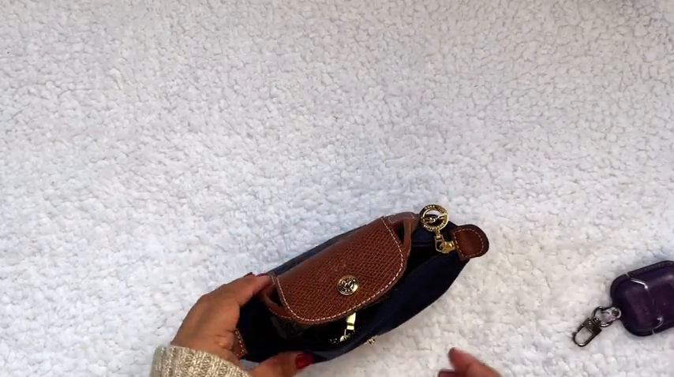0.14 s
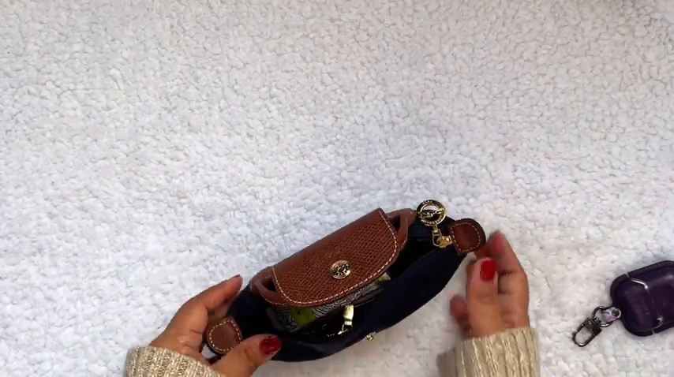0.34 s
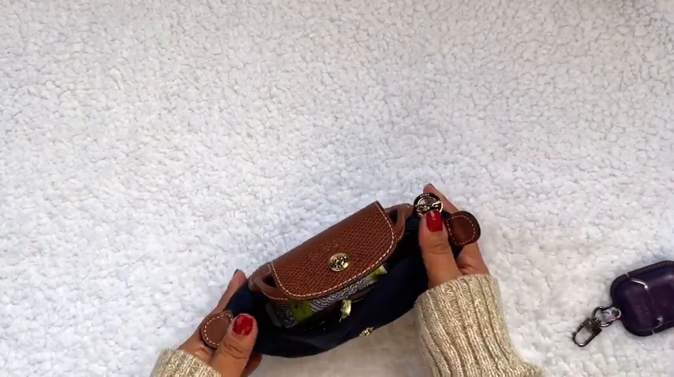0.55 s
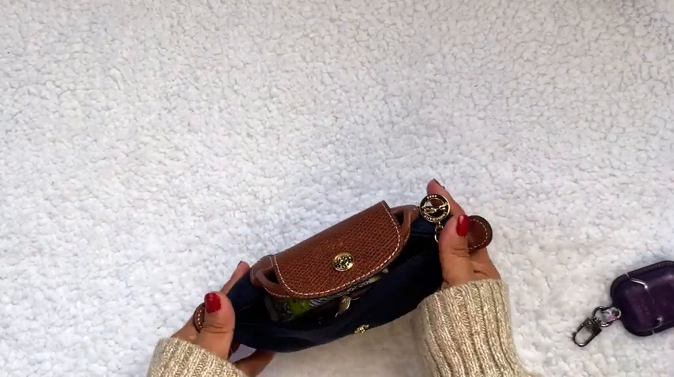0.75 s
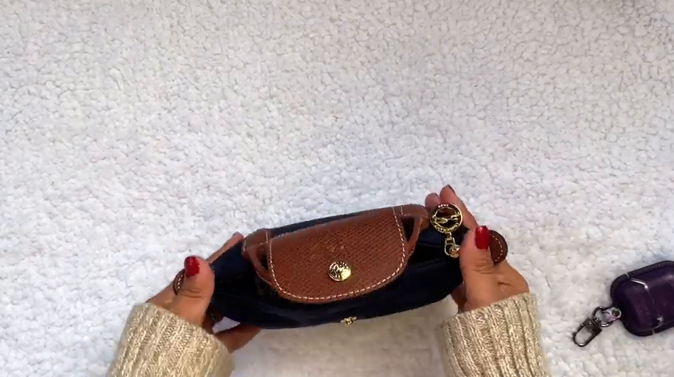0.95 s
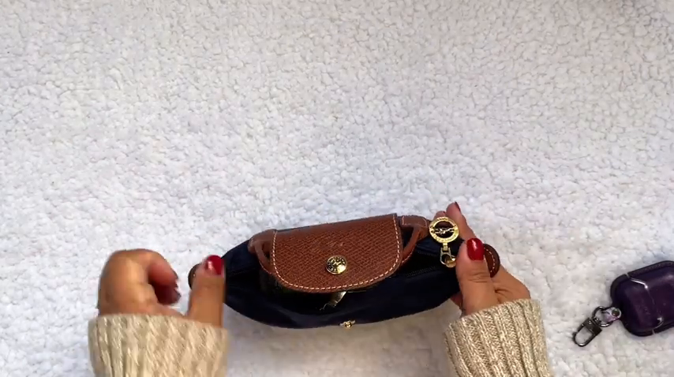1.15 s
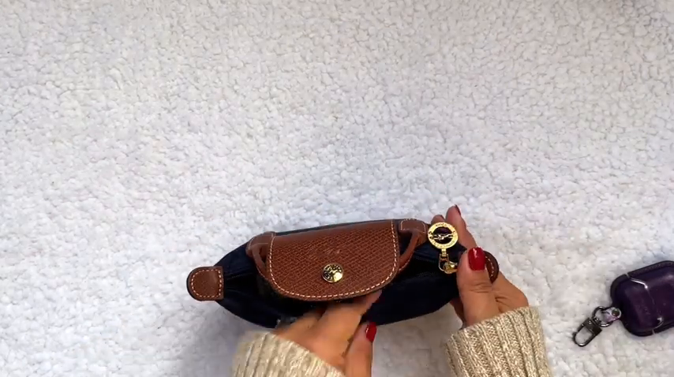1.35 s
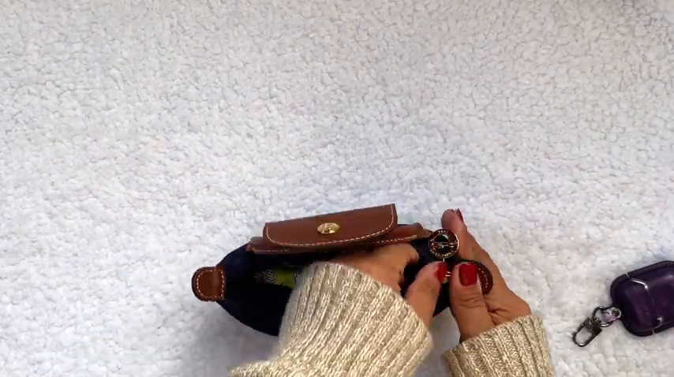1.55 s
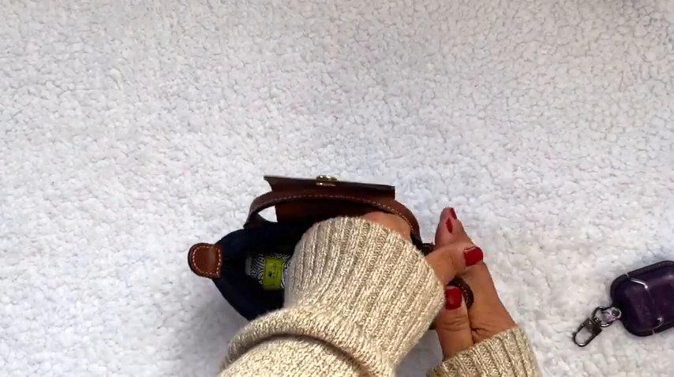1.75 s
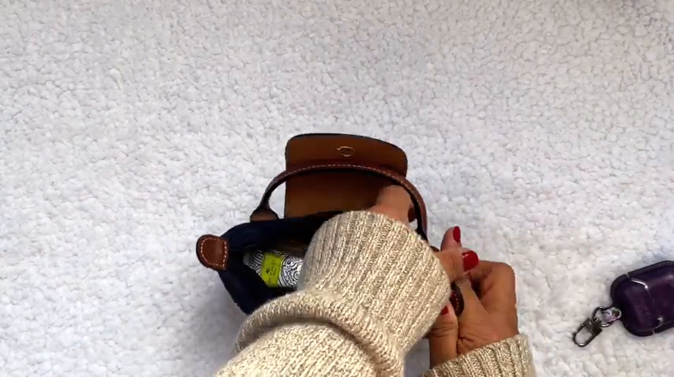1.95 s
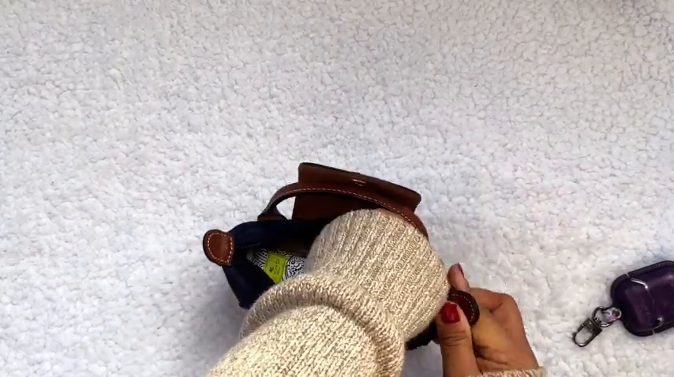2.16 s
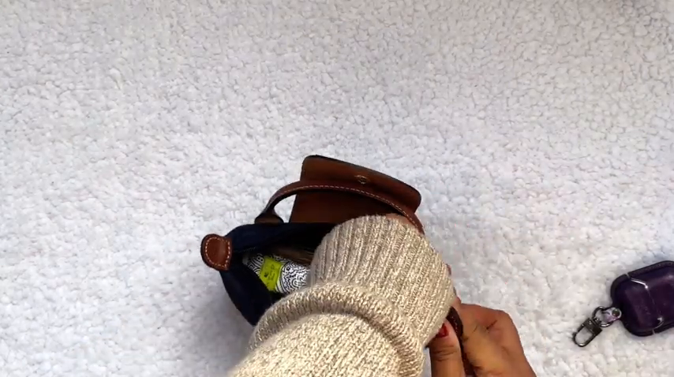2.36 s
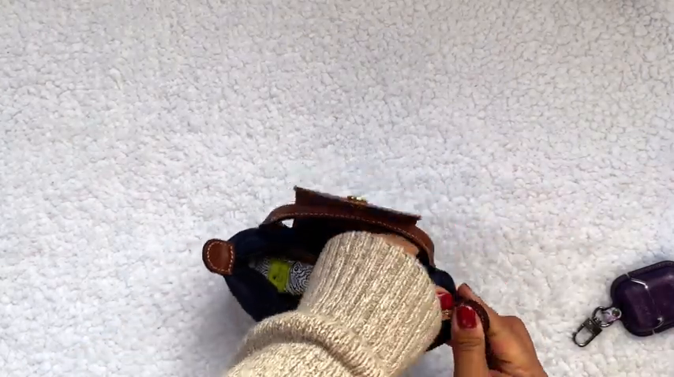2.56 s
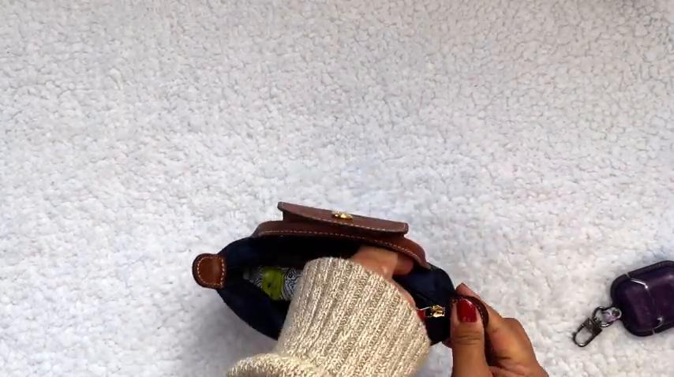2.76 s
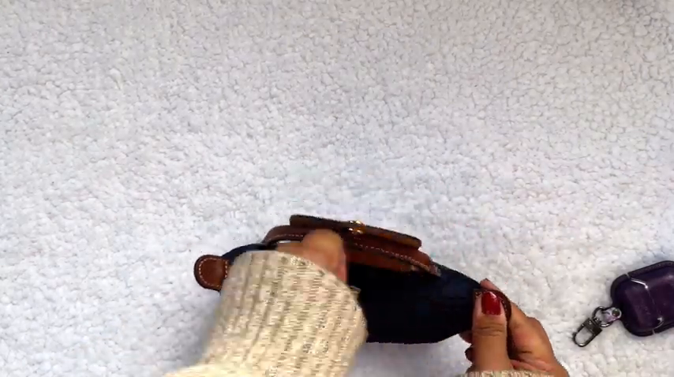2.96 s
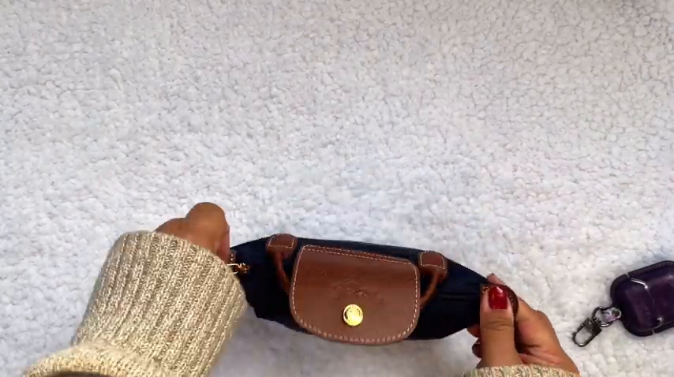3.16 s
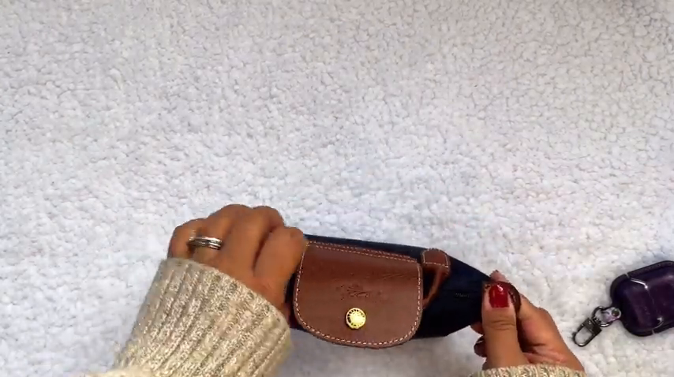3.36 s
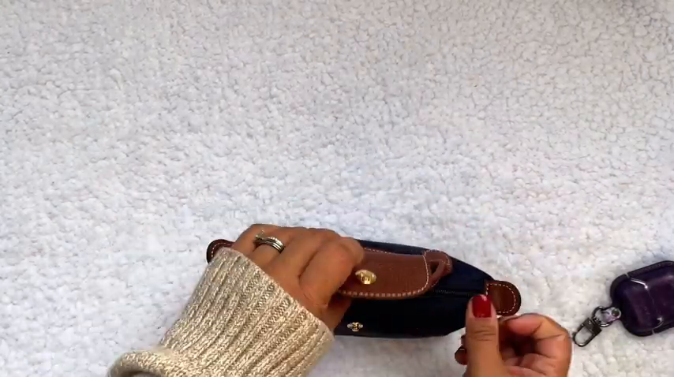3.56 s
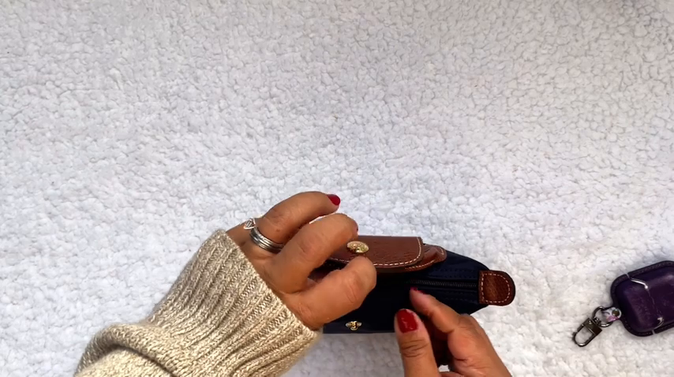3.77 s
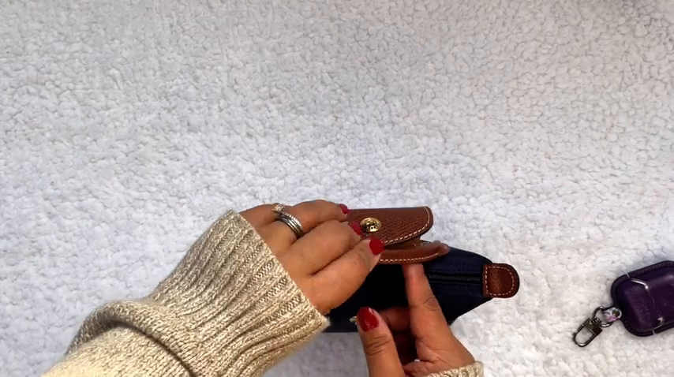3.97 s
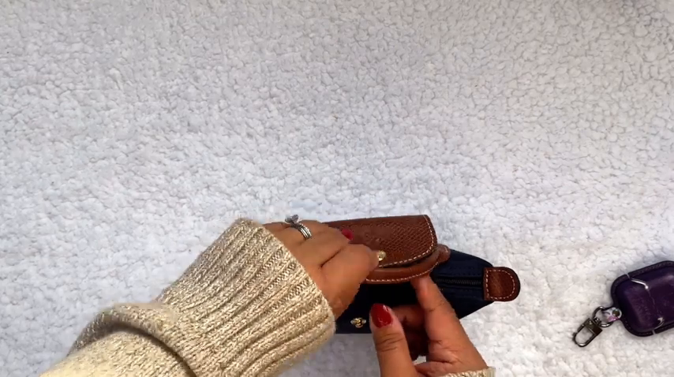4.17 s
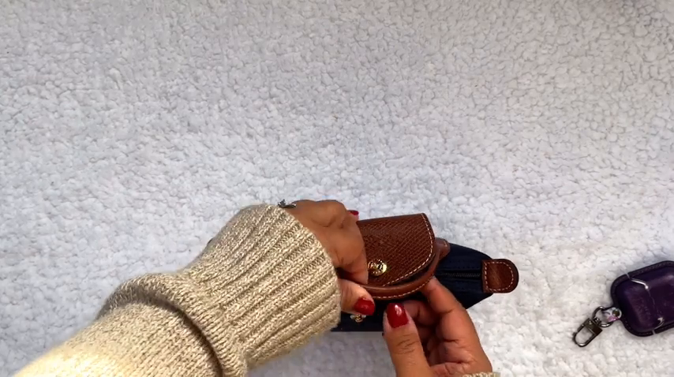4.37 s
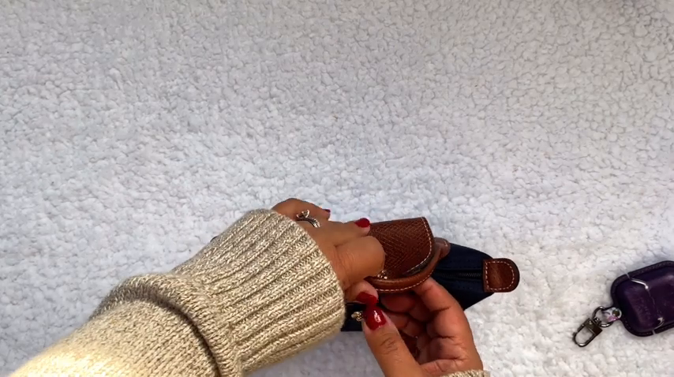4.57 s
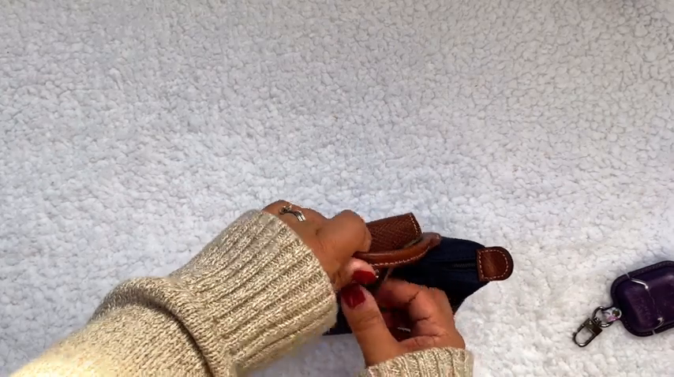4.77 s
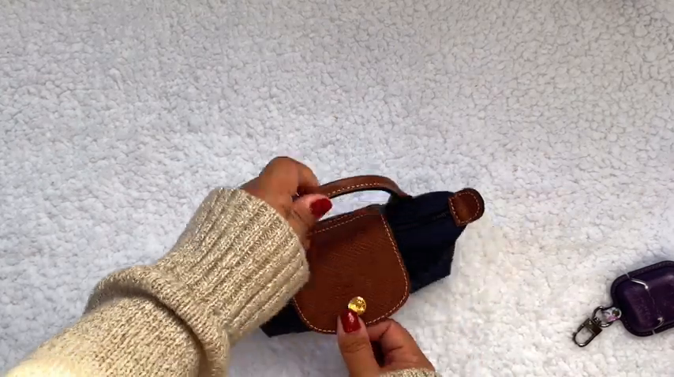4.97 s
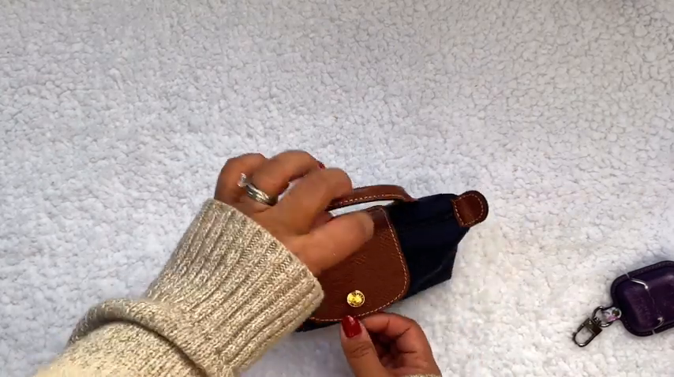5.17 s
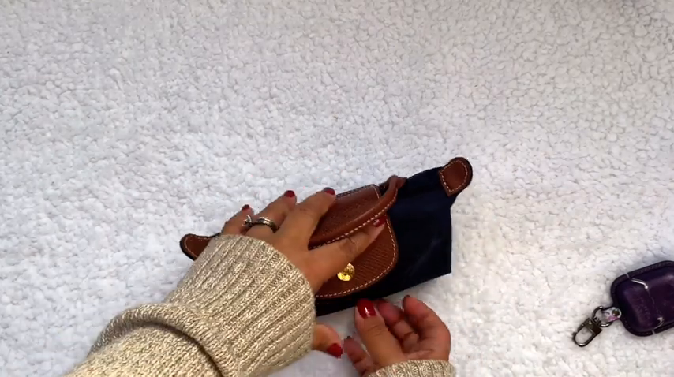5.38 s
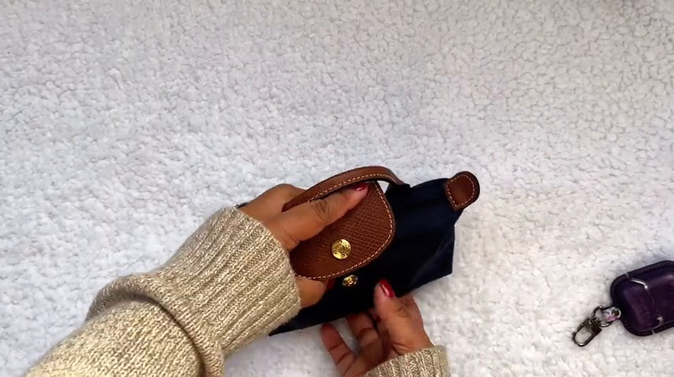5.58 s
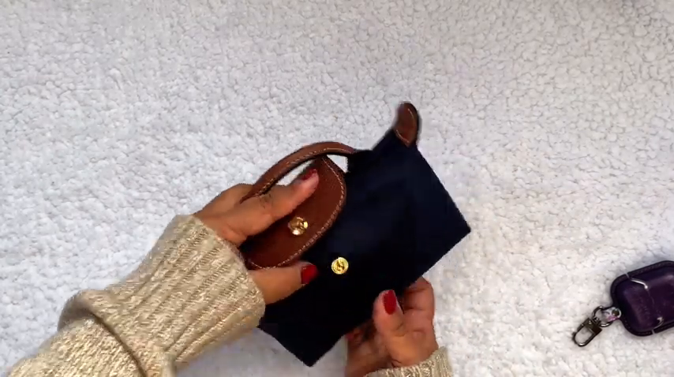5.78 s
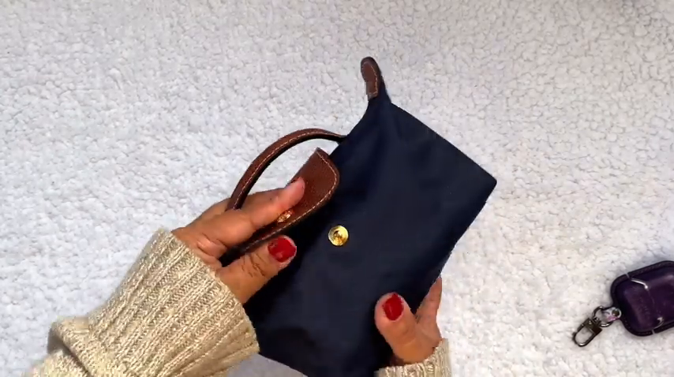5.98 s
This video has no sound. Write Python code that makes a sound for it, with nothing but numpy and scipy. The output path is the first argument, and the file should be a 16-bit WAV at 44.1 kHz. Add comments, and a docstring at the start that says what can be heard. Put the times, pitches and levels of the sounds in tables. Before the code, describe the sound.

Close up in a quiet room, hands rub and crumple a small nylon pouch, with dry scuffs, light ticks and soft knocks. Near the middle a coil zipper closes in one very short stroke, its rasping hum climbing quickly in pitch before stopping. A metal tab clinks lightly, then uneven rustling and clicking continue, growing denser towards the end. Faint room noise lies beneath.

```python
"""First hands rub and crumple a small nylon pouch: uneven noise with crackling cloth and short scuffs.
Nails, pull tab and contents tick and knock as short rings, and the tab clinks. Near 2.8 s a coil zipper
is pulled shut in one quick stroke close under a phone: its teeth, in fast succession, hum and rasp.
Then the hands go on rubbing and ticking to the end. Soft noise of a quiet room lies under it all.
Around 9 to 13 kHz left and right carry nearly opposite signals, so their sum is weak there."""
import sys
import numpy as np
from scipy import signal
from scipy.fft import rfft, irfft, next_fast_len
from scipy.io import wavfile
from scipy.ndimage import uniform_filter1d, map_coordinates

SR = 44100
rng = np.random.default_rng(int(sys.argv[2]) if len(sys.argv) > 2 else 0)


def file_out(sig):
    """Save sig as 16-bit WAV at sys.argv[1]."""
    # one column per channel
    cols = np.atleast_2d(sig).T
    # limit, then scale
    lim = np.clip(cols, -1, 1)
    pcm = np.round(lim * 32767).astype(np.int16)
    wavfile.write(sys.argv[1], SR, pcm)


N = 266259  # length in samples

# Resonances of the stuffed pouch. Each row: pitch in Hz, width in Hz, level in dB
# (the level counts twice where the response is squared).
POUCH_MODES = [(142, 80, -4.5), (280.7, 98.4, 1.5), (423, 148, 1.5), (688, 250, -9.5)]
# Treble colour of rubbed cloth and rasping teeth. Each row: frequency in Hz, relative level in dB.
FIZZ_COLOUR = [(1800, -49), (2800, 3.5), (4300, 4.5), (6000, 0), (8000, 0.5), (11000, -10.5), (14500, -13),
               (16500, -26.5)]


def amp(db):
    """Turn dB into gain."""
    return 10 ** (np.asarray(db) / 20)


def unit(x):
    """Scale x to an rms of 1."""
    return x / np.sqrt(np.mean(x ** 2) + 1e-20)


def along(points, hz):
    """Read a curve of (Hz, value) points at hz, on a log frequency axis."""
    f, v = np.transpose(points)
    return np.interp(np.log(hz + 1), np.log(f + 1), v)


def curves(rows):
    """Give one value per sample for each column after the time column."""
    seconds, *columns = np.transpose(rows)
    return [np.interp(np.arange(N) / SR, seconds, column) for column in columns]


def wobble(rate):
    """Draw a smooth random curve with this many random points a second."""
    knots = rng.standard_normal(int(N * rate / SR) + 4)
    return map_coordinates(knots, [np.arange(N) * rate / SR])


def filtered(x, response):
    """Multiply the spectrum of x by a response, a function of frequency."""
    m = next_fast_len(x.shape[-1] + SR // 4)
    spectrum = rfft(x, m) * response(np.fft.rfftfreq(m, 1 / SR))
    return irfft(spectrum, m)[..., :x.shape[-1]]


def modes(table):
    """Make the response of a few resonances that ring only after they are struck."""
    def response(f):
        return sum((-1) ** k * amp(db) * 1j * f * w / (c * c - f * f + 1j * f * w)
                   for k, (c, w, db) in enumerate(table))
    return response


def shape(points):
    """Make a response from (Hz, dB) points."""
    return lambda hz: amp(along(points, hz))


def fibres(response, unevenness, patchy_db):
    """Make two noises of joint rms 1 that follow an unevenness curve, in patches of random gain."""
    z = signal.stft(unevenness * rng.standard_normal((2, N)), nperseg=256)[2]
    field = rng.standard_normal(z.shape[1:])
    field = uniform_filter1d(uniform_filter1d(field, 4, 0), 8, 1)  # smooth over frequency, then time
    noise = signal.istft(z * amp(patchy_db * unit(field)), nperseg=256)[1]
    return unit(filtered(noise[:, :N], response))


def zipper():
    """Each tooth that the slider closes is one jolt: a hum at the tooth rate and a burst of rasp."""
    # The slider stroke. Each row: time in seconds, teeth per second, level of the hum in dB,
    # ring of the open tape in Hz, level of that ring in dB (counts twice), level of the rasp in dB.
    stroke = [(2.765, 65.5, -66, 1010, 2, -48.5), (2.81, 71.4, -64, 1000, 0, -56.5),
              (2.83, 118, -53, 990, -11.5, -44), (2.855, 178, -55.5, 1000, 3.5, -43.5),
              (2.868, 266, -50.5, 1000, 8, -40), (2.88, 300, -45, 1020, 5, -38),
              (2.9, 327, -43, 1003, 4, -37.5), (2.935, 345, -33, 1050, -4, -38.5),
              (2.96, 370, -34.5, 1095, 3, -40.5), (2.967, 415, -38, 1084, -4, -34),
              (2.976, 487, -30.5, 1000, 2.5, -35), (2.99, 530, -40, 1050, 4, -38.5),
              (3.003, 562, -35.5, 1110, 1, -34), (3.012, 650, -35.5, 1890, 0, -38.5),
              (3.027, 685, -23, 2110, 1, -35), (3.042, 775, -24.5, 2380, -2.5, -32),
              (3.047, 802, -33, 1600, 5.5, -32), (3.062, 880, -30, 1700, 3, -35),
              (3.066, 730, -22.5, 1480, -5, -35), (3.073, 680, -26.5, 1375, 4.5, -34),
              (3.082, 557, -30, 1240, 2, -31.5), (3.09, 477, -38, 1030, -1.5, -44),
              (3.1, 200, -59.5, 900, -11, -48.5), (3.125, 120, -63.5, 900, -13, -47),
              (3.14, 50, -70, 900, -11, -62.5)]
    # What the hum rings in. Each row: pitch in Hz, width in Hz, level in dB (counts twice).
    hum_modes = [(138, 150, 5.5), (354, 140, 3.5), (522, 95, 2.5), (838, 137, 2.5), (2450, 1100, -5),
                 (4000, 900, -3.5)]
    # Resonances of slider and tape. Each row: pitch in Hz, width in Hz, level in dB.
    slider = [(694, 150, -11), (1088, 110, -2), (2010, 580, -6.5), (3120, 77, -7)]
    flutter_db = 2.2  # unsteadiness of each overtone
    ring_width = .25  # ring of the tape, as a share of its pitch
    rasp_bright_db, rasp_body_db = -7, -11  # treble and pouch shudder, against the main rasp

    rate, pull_db, ring_hz, ring_db, rasp_db = curves(stroke)
    t = np.arange(N) / SR
    moving = 1. * ((t > stroke[0][0]) & (t < stroke[-1][0]))
    moving = uniform_filter1d(moving, 200)  # soft start and stop
    teeth = np.cumsum(rate * (1 + .014 * wobble(110))) / SR  # teeth closed so far

    # an overtone is loud while it passes a resonance of pouch, slider or tape
    tape = (ring_hz, ring_width * ring_hz, ring_db)
    rings = [(c, w, amp(db) ** 2) for c, w, db in hum_modes + [tape]]

    def gain(hz):
        return np.sqrt(sum((g / (1 + ((c * c - hz * hz) / (hz * w)) ** 2)) ** 2 for c, w, g in rings))

    # teeth lock a little early or late, which blurs the upper overtones most
    slip = teeth + 0.03 * wobble(300)
    hum = 0
    for k in range(1, 11):
        level = amp(pull_db + flutter_db * wobble(110))
        hum = hum + level * gain(k * rate) * np.exp(2j * np.pi * k * slip)

    # the rasp flares as a tooth locks and fades until the next; teeth differ in strength
    strength = amp(0.57 * rng.standard_normal(int(teeth[-1]) + 2))[teeth.astype(int)]
    flare = unit(0.2 + strength * np.exp(-3.5 * (teeth % 1)))
    flare = flare * rng.standard_normal((2, N))
    rasp = unit(filtered(flare, modes(slider)))
    rasp += amp(rasp_bright_db) * unit(filtered(flare, shape(FIZZ_COLOUR)))
    rasp += amp(rasp_body_db) * unit(filtered(flare, modes(POUCH_MODES)))
    hum_pair = [hum.imag, .6 * hum.real - 0.18 * hum.imag]
    return moving * [[1], [.6]] * (amp(rasp_db) * rasp + hum_pair)


def contacts():
    """A short ring that sags in pitch, with a bright edge; the same blow knocks the stuffed pouch."""
    # Each row: start in seconds, peak of the tick in dB, pitch in Hz, knock in dB over the tick,
    # bright edge in dB over the ring (lowered by 1 dB below), seconds for the ring to fade by 60 dB.
    ticks = [(0.018, -33.5, 835, -5, -16, 0.021), (0.0299, -49, 2240, 12, -15, 0.059),
             (0.08, -55, 1210, 12.5, -16, 0.022), (0.743, -49.5, 1180, 11.5, -6, 0.022),
             (0.798, -40, 3590, -15, -9, 0.03), (0.846, -50.5, 1180, -7, -15, 0.013),
             (0.984, -39, 2090, -23, -31, 0.027), (1.077, -42, 740, 4.5, -17, 0.062),
             (1.324, -34.5, 990, -13, 9.5, 0.022), (1.349, -34.5, 1070, -7, 7, 0.055),
             (1.38, -39, 1470, -10, 6, 0.011), (1.397, -39, 1340, -12, 2, 0.015),
             (1.407, -45, 1390, -5, -9, 0.01), (1.603, -38.5, 1270, -7, -12, 0.011),
             (1.647, -40, 1056, -2, -15.5, 0.01), (1.954, -35.5, 1290, -1, 18, 0.0074),
             (2.062, -32, 1115, -3, 9, 0.025), (2.099, -57, 2130, -14, -3.5, 0.0091),
             (2.135, -48, 1700, -21, -10, 0.012), (2.163, -33.5, 2470, -11, -9, 0.0084),
             (2.172, -24.5, 1120, -6, 8.5, 0.0024), (2.245, -37, 1500, -4, -2, 0.0078),
             (2.265, -31.5, 1850, -12, 6.5, 0.012), (2.348, -41, 1040, -14, 0.5, 0.042),
             (2.358, -32, 1590, -20, 4, 0.035), (2.593, -45.5, 3900, -25, -6, 0.014),
             (2.626, -46, 2010, -26.5, 13, 0.018), (2.666, -47.5, 2040, -11, 12, 0.021),
             (2.7659, -34, 3940, -11, 7.5, 0.024), (2.781, -32, 4150, -11, 12, 0.11),
             (2.797, -43, 1890, -26, 2, 0.02), (2.815, -39.5, 1106, -12, 2.5, 0.025),
             (2.9645, -28, 3960, -28, -10.5, 0.012), (2.9698, -17, 4220, -25, -4.5, 0.011),
             (2.9734, -27.5, 1466, -30, -1.5, 0.016), (3.083, -27, 4470, 2, -6.5, 0.01),
             (3.101, -31.5, 2930, -13, -6, 0.013), (3.112, -29, 3130, -3.5, -0.5, 0.02),
             (3.143, -35, 1186, -22, -26, 0.018), (3.175, -33, 717, -11, -26.5, 0.014),
             (3.275, -38, 930, -22, -10.5, 0.018), (3.299, -43.5, 1020, 6, -2.5, 0.011),
             (3.323, -34, 1040, -4, -13.5, 0.015), (3.338, -34.5, 1020, -3, -7, 0.015),
             (3.476, -49, 1080, 8, -21, 0.033), (3.65, -36.5, 807, -2, 8, 0.047),
             (3.694, -44.5, 1380, -3, -15, 0.025), (4.03, -40, 1800, 4.5, 2, 0.012),
             (4.081, -40.5, 1900, -3.5, -12, 0.015), (4.283, -26, 4060, -11.5, -18, 0.03),
             (4.334, -30.5, 1870, -3, -29, 0.0096), (4.619, -41, 1600, -7, -11, 0.022),
             (4.654, -29.5, 1960, -14, -25, 0.021), (4.674, -34, 2135, -31, -13.5, 0.052),
             (4.6847, -34.5, 1865, -35, -10, 0.05), (4.8373, -35.5, 2020, -28, -3, 0.017),
             (4.8521, -26, 1830, -28, -15, 0.021), (4.8619, -27.5, 1930, -20, -3.5, 0.05),
             (4.866, -24.5, 1574, -6, -5.5, 0.011), (4.897, -33.5, 1900, -3, -1, 0.0078),
             (4.92, -33.5, 1280, 2.5, -9, 0.012), (4.965, -40, 2260, -12, -8, 0.012),
             (4.972, -30, 1050, 1, -7.5, 0.0095), (4.9796, -29, 1890, -1, 5, 0.011),
             (4.9913, -31.5, 2750, -8, 8.5, 0.018), (5.016, -34, 2790, -17, 5, 0.02),
             (5.074, -42, 900, -8, 1, 0.015), (5.159, -37, 3660, -30, -6.5, 0.0096),
             (5.196, -47.5, 2210, -7, -20, 0.019), (5.232, -50, 2330, 4, -19, 0.0176),
             (5.282, -34, 2730, 1, 9, 0.0083), (5.3026, -21.5, 3430, -6.5, -8, 0.0068),
             (5.3066, -31, 3130, -1.5, -22, 0.016), (5.3177, -42, 3310, -14, -7, 0.012),
             (5.336, -41, 1230, 6, -2, 0.01), (5.342, -26, 4220, -11, 3, 0.008),
             (5.369, -40.5, 1140, -8, -12, 0.0076), (5.382, -41, 3600, -14, -7, 0.01),
             (5.3943, -45, 2320, -15, -4, 0.0087), (5.422, -38.5, 3140, 0.5, 1, 0.011),
             (5.442, -34, 1690, 2, 2.5, 0.0065), (5.4541, -23.5, 3370, -17, 0, 0.0064),
             (5.483, -41.5, 1190, -15, -15, 0.0059), (5.49, -39.5, 3700, -19, -14, 0.0092),
             (5.548, -36.5, 1980, -21, -11, 0.02), (5.554, -32, 1820, -2, -22, 0.017),
             (5.5639, -32.5, 3650, -8, -21, 0.021), (5.568, -33, 1130, -6, -18, 0.0057),
             (5.665, -47, 1214, 16.5, -9, 0.024), (5.789, -31.5, 1050, -17, 15, 0.021),
             (5.81, -44.5, 900, 7, -9, 0.0081), (5.8678, -30, 950, -26, -22.5, 0.015),
             (5.8712, -25.5, 1380, -16, -9, 0.013), (5.93, -35.5, 840, -12, -3.5, 0.011),
             (5.9489, -32.5, 1040, -2, -5, 0.014), (5.963, -44, 900, -4, -15, 0.0063),
             (5.975, -43.5, 705, 10.5, -16, 0.015), (5.985, -29, 1754, -32, -17, 0.056)]
    # Colour of the bright edge. Each row: frequency in Hz, relative level in dB.
    crack = [(700, -30), (1800, -6), (4300, 5.5), (8000, -2.5), (11000, -2), (16500, -21)]
    grit = .7  # noise in the ring, against the pure tone
    sag = 0.19  # the pitch starts about 13 % sharp
    rise_cycles = 0.62  # time constant of the ring's rise

    t = np.arange(SR // 16) / SR
    f = np.fft.rfftfreq(len(t), 1 / SR)
    out, blows = np.zeros((2, N + len(t))), np.zeros(N)
    crack_gain = shape(crack)(f)
    for s, db, hz, knock_db, bright_db, t60 in ticks:
        start = round(s * SR)
        fade = amp(-60 * t / t60) * (1 - np.exp(-t * hz / rise_cycles)) ** 2
        noise = rfft(rng.standard_normal((2, 2, len(t))))
        cycles = hz * (t - sag * 0.0012 * np.exp(-t / 0.0017)) + rng.random((2, 1))
        gritty = unit(irfft(noise[0] * modes([(hz, .7 * hz, 0)])(f) ** 2, len(t)))
        tone = np.sin(2 * np.pi * cycles) + grit * gritty
        edge_fade = amp(-110 * t / t60) * (1 - np.exp(-t / 0.0006))
        edge = edge_fade * unit(irfft(noise[1] * crack_gain, len(t)))
        tick = fade * tone / fade.max() + amp(bright_db - 1) * edge
        tick *= amp(db) / np.abs(tick).max(axis=1, keepdims=True)
        out[:, start:][:, :len(t)] += tick
        blows[start] = amp(db + knock_db) * rng.choice([-1, 1])
    # the soft filling spreads each blow over a few ms
    soft_blows = np.convolve(blows, np.hanning(140))[:N]
    knocks = filtered(soft_blows, modes(POUCH_MODES))
    return out[:, :N] + [knocks, 0.13 * np.roll(knocks, 25)]


def hands():
    """Skin and wool slide over nylon and leather in uneven slips; the stuffed pouch rumbles along."""
    # Each row: time in seconds, level of the rubbing in dB, then treble and pouch rumble in dB over it.
    rubbing = [(0, -74.5, -4, 15), (.14, -63.5, 4, 4), (.32, -77, 12, -20), (.5, -85, -4, 18.5),
               (.57, -70.5, 13, -10), (.7, -59, -16, -2), (.83, -69, 1.5, 4), (.9, -69.5, -7, 2.5),
               (1.06, -60, 3.5, -4), (1.14, -72, -7, 9), (1.3, -94, 7, 11), (1.33, -80, 10.5, -6),
               (1.465, -66, 7, -10), (1.48, -60.5, 5, -6), (1.55, -52, 1, -9), (1.63, -65, -6.5, -4.5),
               (1.76, -61, -12.5, 3.5), (1.97, -67.5, -3.5, -3), (2.1, -56, -3, -2), (2.27, -73.5, 8, 13),
               (2.4, -50.5, -17.5, -7.5), (2.57, -63, 3, -7), (2.61, -74.5, -2, -2), (2.72, -75, 2, 7.5),
               (2.76, -66, 10, -3), (3.13, -59.5, -14, -14), (3.23, -63.5, -14.5, 7),
               (3.247, -75, -6.5, 11), (3.3, -60, -2, 5), (3.42, -69, -10, 2.5), (3.6, -62, -3.5, -1.5),
               (3.68, -61, -3, -5), (3.76, -60.5, -1.5, -1), (3.775, -69.5, 4, 4), (3.905, -74, 6.5, 3),
               (3.92, -65.5, 2, -3), (4.02, -65.5, -7, -1), (4.3, -81.5, 15, -5), (4.46, -85.5, 8.5, -1.5),
               (4.526, -84, 6, 3.5), (4.536, -71.5, 11.5, -10), (4.62, -66, 2.5, 4), (4.8, -69, 0, 1),
               (4.87, -49.5, -8.5, -8), (4.955, -65.5, -2, 8), (5.0, -53, -6.5, 3), (5.05, -58.5, -2, 7.5),
               (5.068, -66, 5, 9.5), (5.1, -62.5, 0, -8.5), (5.26, -74.5, 7, 1), (5.3, -44.5, -11.5, -9),
               (5.39, -65, 4.5, 10), (5.5, -55.5, 0.5, -0.5), (5.66, -60, -2.5, 7),
               (5.84, -56.5, -8.5, 2.5), (5.93, -41, -19.5, -15), (6.04, -62.5, 8.5, 1)]
    # Colour of the rubbing. Each row: frequency in Hz, relative level in dB.
    rub_colour = [(300, -41), (520, -8.5), (800, 3.5), (1500, 0.5), (2200, 4), (3000, -14), (4200, -4),
                  (7000, -62)]

    rub_db, treble_db, body_db = curves(rubbing)
    # single crinkles of the cloth, about 260 a second, each fading quickly
    creases = rng.uniform(0, 2.64, size=N) * (rng.random(N) < 260 / SR)
    crinkle = 1 + 0.8 * signal.lfilter([1], [1, -.95], creases)
    slips = amp(2.5 * wobble(35) + 1.1 * wobble(220)) * crinkle
    rub = amp(rub_db) * fibres(shape(rub_colour), slips, patchy_db=2.5)
    fizz = amp(rub_db + treble_db) * fibres(shape(FIZZ_COLOUR), slips, patchy_db=2.5)
    rumble = fibres(lambda hz: modes(POUCH_MODES)(hz) ** 2, amp(4 * wobble(40)), patchy_db=2.5)
    body = amp(rub_db + body_db) * rumble
    return rub + fizz + body + amp(rub_db + 5) * crackles()


def crackles():
    """Creases of stiff cloth pop at random moments, each with its own pitch and size."""
    pops_per_s, middle_hz, life_cycles = 220, 2100, 2.2
    when, octave, size = rng.random((3, int(pops_per_s * N / SR), 1))
    k = np.arange(260)  # samples of one pop
    cycles = middle_hz * 2 ** (3 * octave - 1.4) * k / SR
    swell = cycles * np.exp(1 - 3 * cycles / life_cycles)
    gain = amp(-5 * np.log(size + .01)) / 2  # a few pops are much larger than the rest
    pops = gain * np.sin(2 * np.pi * cycles) * swell
    places = (when * N).astype(int) + k
    return np.bincount(places.ravel(), pops.ravel(), N + len(k))[:N] * [[1], [.6]]


def scuffs():
    """Grainy rubs: level climbs to a peak and drops, pitched by the spot that is rubbed."""
    # Each row: time of the peak in seconds, level there in dB, rise and fall in seconds (for 6.5 dB),
    # pitch in Hz, width as a share of the pitch, treble and pouch body in dB over the pitched layer.
    short_rubs = [(0.03, -54.5, 0.0045, 0.0044, 780, 1, -4, 7.5),
                  (0.161, -62.5, 0.019, 0.0104, 1340, 1, -15, 6),
                  (0.22, -69, 0.078, 0.071, 2540, 0.42, 0, -10),
                  (0.601, -69.5, 0.29, 0.017, 1240, 1, 1, -1),
                  (0.677, -56.5, 0.028, 0.011, 970, 0.86, 2, -2.5),
                  (0.781, -43, 0.011, 0.019, 590, 0.36, -24, -16),
                  (0.78, -37.5, 0.011, 0.0098, 1200, 0.081, -29, -19),
                  (0.789, -50.5, 0.022, 0.0054, 3400, 0.19, -16, -26),
                  (0.8, -50, 0.002, 0.0047, 1320, 1, -13, -4.5),
                  (0.988, -46, 0.0069, 0.019, 540, 0.24, -12, -4.5),
                  (1.024, -50.5, 0.028, 0.01, 2200, 0.31, 1, -17),
                  (1.032, -63.5, 0.021, 0.018, 4150, 0.062, -16, -25),
                  (1.058, -50, 0.015, 0.013, 1070, 0.4, -9, -2),
                  (1.356, -52, 0.0061, 0.0067, 1330, 1, -7.5, -3.5),
                  (1.403, -61.5, 0.018, 0.035, 1410, 0.71, 4.5, -3),
                  (1.546, -48, 0.038, 0.013, 1720, 0.43, -8.5, -10),
                  (1.644, -54, 0.018, 0.0075, 970, 0.61, -3.5, -3),
                  (1.727, -55, 0.033, 0.026, 1050, 1, 3.5, -3),
                  (1.834, -58.5, 0.0084, 0.0064, 1300, 0.91, -11, 0),
                  (1.913, -60, 0.015, 0.015, 1630, 0.69, 1, -4.5),
                  (1.959, -55.5, 0.0082, 0.021, 1590, 1, -4, 4.5),
                  (2.018, -49, 0.0091, 0.015, 1720, 0.4, -1, -10),
                  (2.171, -44.5, 0.0096, 0.0055, 1680, 1, 3.5, -6.5),
                  (2.265, -51, 0.017, 0.0056, 1650, 1, -7.5, 3.5),
                  (2.408, -47, 0.0071, 0.027, 1640, 1, 4.5, -6.5),
                  (2.52, -53.5, 0.0033, 0.035, 1570, 0.95, -8.5, -4.5),
                  (3.114, -41, 0.007, .011, 704, 0.64, -16, 7),
                  (3.182, -44, 0.0022, 0.0092, 1103, 0.34, -11, 3.5),
                  (3.271, -55.5, 0.0021, 0.02, 1210, 0.36, -7, 8.5),
                  (3.33, -46, 0.0053, 0.018, 1053, 0.08, -8, 0),
                  (3.484, -55, 0.0056, 0.026, 1200, 0.81, -11, -3),
                  (3.566, -52, 0.016, 0.0049, 1370, 0.71, -9.5, -2),
                  (3.658, -57.5, 0.0047, 0.07, 1210, 1, 5.5, 3.5),
                  (4.036, -49.5, 0.0077, 0.031, 1430, 1, -8.5, -7.5),
                  (4.074, -63.5, 0.008, 0.017, 1770, 0.9, 12, -13),
                  (4.283, -51, 0.026, 0.021, 1580, 1, 1.5, -1.5),
                  (4.411, -63.5, 0.11, 0.027, 1720, 0.74, -11, -7.5),
                  (4.683, -49.5, 0.0082, 0.0088, 2130, 0.27, -1, 9.5),
                  (4.743, -54.5, 0.079, 0.014, 1990, 0.58, -13.5, -9.5),
                  (4.789, -55, 0.012, 0.011, 4240, 0.18, -8, -25),
                  (4.79, -59, 0.0075, 0.3, 1870, 1, 6.5, -19),
                  (4.862, -39.5, 0.0093, 0.011, 1550, 1, 0.5, -6),
                  (4.92, -55.5, 0.026, 0.0094, 1460, 0.92, 3.5, 7.5),
                  (4.977, -46.5, 0.0048, 0.015, 1320, 1, -6.5, 10),
                  (5.302, -40, 0.0041, 0.0074, 3300, 1, -12.5, -2.5),
                  (5.464, -47.5, 0.014, 0.0021, 3000, 0.16, -8, -14),
                  (5.566, -49.5, 0.003, 0.0086, 1550, 0.53, -20, 11.5),
                  (5.789, -56.5, 0.061, 0.04, 1600, 1, -2, -10), (5.875, -44, .007, 0.037, 1410, 1, 4, -7),
                  (5.911, -46.5, 0.022, 0.0078, 2100, 0.25, 7.5, -4.5),
                  (5.953, -43.5, 0.015, 0.0052, 1090, 0.46, -6.5, -28),
                  (5.99, -48.5, 0.0068, 0.0076, 1800, 0.18, -3.5, -7)]

    t = np.arange(-4800, 4800) / SR
    f = np.fft.rfftfreq(len(t), 1 / SR)
    out = np.zeros((2, N + len(t)))
    fizz, body = shape(FIZZ_COLOUR)(f), modes(POUCH_MODES)(f) ** 2
    for s, db, rise, fall, hz, width, bright_db, body_db in short_rubs:
        swell = amp(-6.5 * np.abs(t / np.where(t < 0, rise, fall)) ** 1.17)
        # the loudness jumps every 60 samples, which makes the grain
        grains = amp(1.9 * np.repeat(rng.standard_normal((3, 1, len(t) // 60)), 60, axis=2))
        noise = rfft(grains * rng.standard_normal((3, 2, len(t))))
        pitched = modes([(hz, width * hz, 0), (1.95 * hz, .5 * hz, -2.5)])(f) ** 2
        layers = 0
        for z, colour, level in zip(noise, (pitched, fizz, body), (0, bright_db, body_db)):
            layers = layers + amp(level) * unit(irfft(z * colour, len(t)))
        out[:, round(s * SR):][:, :len(t)] += amp(db) * swell * layers
    return out[:, len(t) // 2:][:, :N]  # puts each peak at its own time


def pull_tab():
    """The metal tab clinks on the slider and keeps rattling, so its modes flutter and blur."""
    # Each row: start of a clink in seconds, level in dB.
    clink_times = [(.745, -72.5), (.822, -82), (2.275, -53.5), (2.405, -70), (3.272, -53.5), (3.303, -48.5),
                   (3.325, -60), (3.339, -56), (3.477, -78)]
    # Modes of the tab. Each row: pitch in Hz, level in dB, seconds to fade by 60 dB.
    tab_modes = [(6300, -8, .03), (8540, 1, .09), (11050, -2, .05), (14100, -2, .12)]
    hiss_db, hiss_t60 = 5, .05  # hiss of the contact: dB over the clink, seconds to fade by 60 dB

    t = np.arange(SR // 6) / SR
    rings, clinks = np.zeros((len(tab_modes), N), complex), np.zeros(N)
    for s, db in clink_times:
        start = round(s * SR)
        for ring, (hz, level, t60) in zip(rings, tab_modes):
            chance_db = 3.1 * rng.standard_normal()  # every clink excites the modes differently
            fade = amp(db + level + chance_db - 60 * t / t60) * (1 - np.exp(-t / .001))
            ring[start:][:len(t)] += fade * np.exp(2j * np.pi * hz * t)
        clinks[start:][:len(t)] += amp(db + hiss_db - 60 * t / hiss_t60)
    hiss = unit(filtered(rng.standard_normal((2, N)), lambda hz: hz > 7000))
    rattle = sum((ring * (wobble(250) + 1j * wobble(250))).real for ring in rings)
    return clinks * hiss + rattle


def walls(x):
    """The room answers with fading noise in which each frequency dies at its own speed."""
    # Each row: frequency in Hz, seconds to fade by 60 dB.
    fade_times = [(200, 0.34), (2000, 0.074), (10000, 0.13)]
    hz, t, z = signal.stft(rng.standard_normal((2, SR // 3)), SR, nperseg=256)
    fade = amp(-60 * t / along(fade_times, hz)[:, None])
    tail = signal.istft(z * fade, SR, nperseg=256)[1]
    late = np.pad(x, ((0, 0), (200, 0)))  # the answer starts 200 samples later
    return signal.fftconvolve(late, tail / np.linalg.norm(tail[0]), axes=1)[:, :N]


def room_air():
    """The quiet room is a soft, slightly unsteady noise."""
    # Colour of the noise. Each row: frequency in Hz, relative level in dB.
    air_colour = [(20, -47), (45, 1.5), (80, 1), (110, -13), (330, -18.5), (600, -34), (2000, -25),
                  (6000, -33), (16500, -46)]
    return amp(-65.5) * fibres(shape(air_colour), amp(0.36 * wobble(3.2)), patchy_db=3.0)


def scene():
    """Add the sources, which come as (shared, differing) pairs, and spread them over left and right."""
    # Weight of the shared part; it is weak around 9 to 13 kHz. Each row: frequency in Hz, gain in dB.
    shared_gain = [(20, 6), (6500, -3), (8000, -8.5), (8700, -11.5), (9700, -25), (12800, -32),
                   (14200, -4.5), (15500, 6)]
    # Weight of what differs between the sides. Each row: frequency in Hz, gain in dB.
    differing_gain = [(60, -9), (200, -2.5), (380, -5.5), (700, 4), (1300, -10), (2600, -5.5), (4400, -7),
                      (8000, -2), (16000, 5.5)]
    close = zipper() + contacts()
    pouch = close + amp(-11.0) * walls(close) + hands() + scuffs() + pull_tab()
    mid, side = filtered(pouch + room_air(),
                         lambda hz: amp([along(shared_gain, hz), along(differing_gain, hz)]))
    # the pouch lies slightly left: louder and earlier there
    side = side + 0.072 * mid + 0.4 * np.gradient(mid)
    return np.array([mid + side, mid - side])


def record(dry):
    """The phone drops the deepest bass and keeps nothing above its band limit."""
    bottom_hz, top_hz = 38, 16000
    return filtered(dry, lambda hz: (hz < top_hz) / (1 + (bottom_hz / (hz + 1)) ** 4))


dry = scene()
out = record(dry)
file_out(out)
```